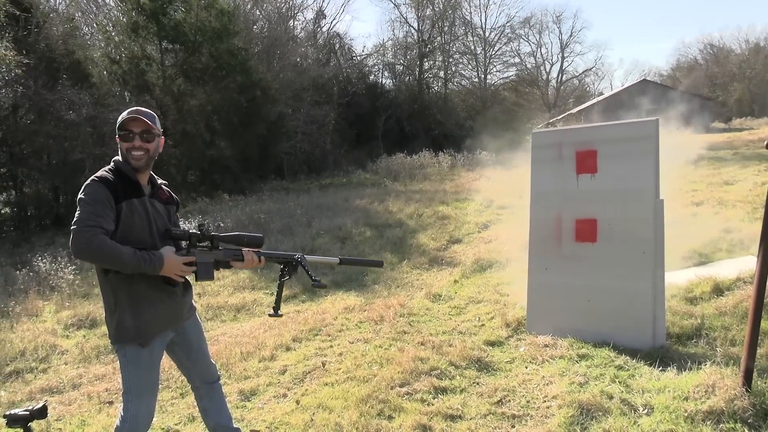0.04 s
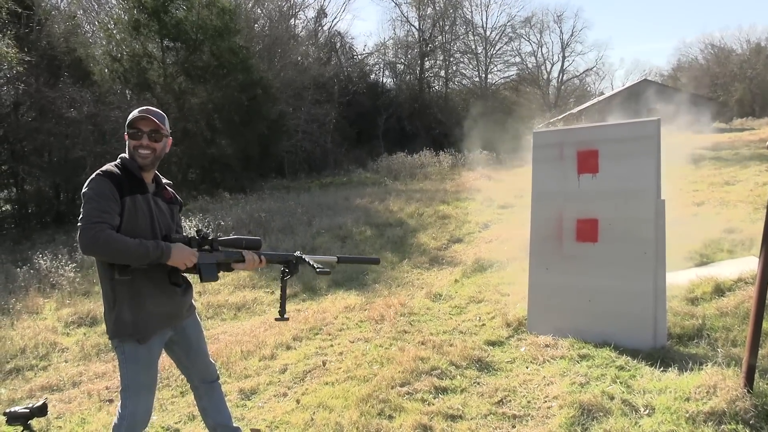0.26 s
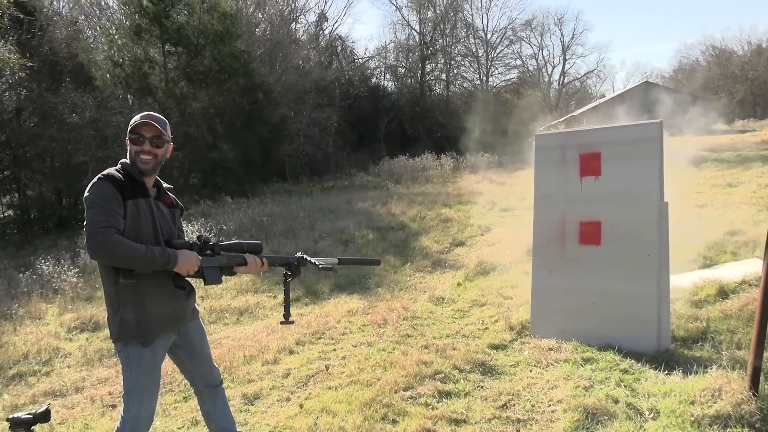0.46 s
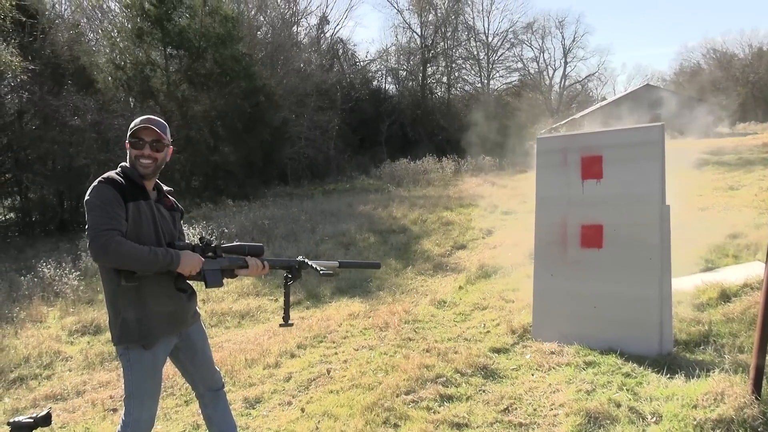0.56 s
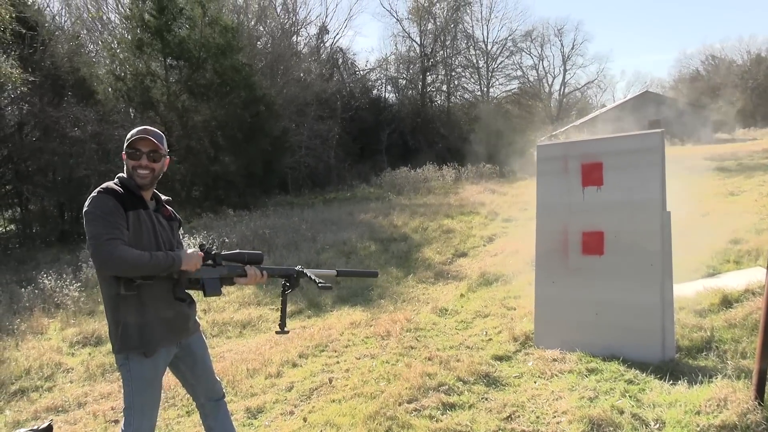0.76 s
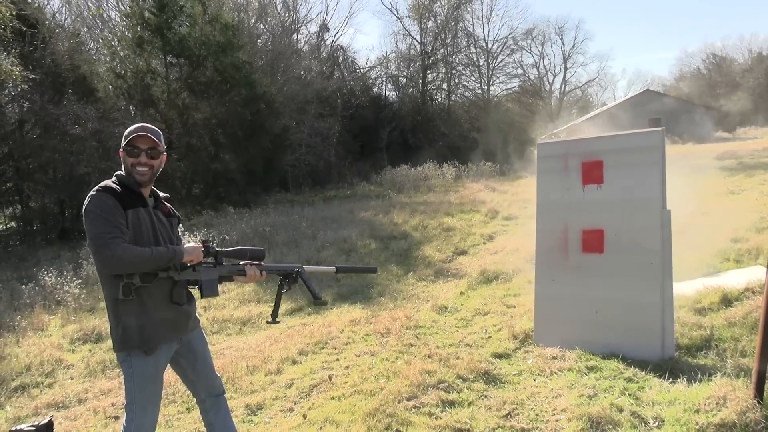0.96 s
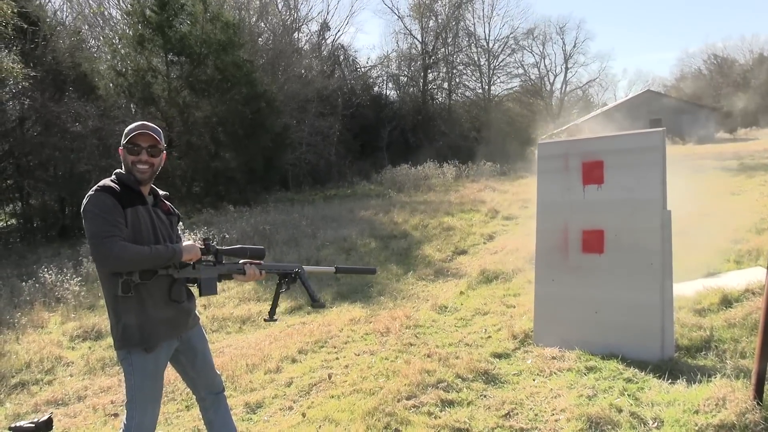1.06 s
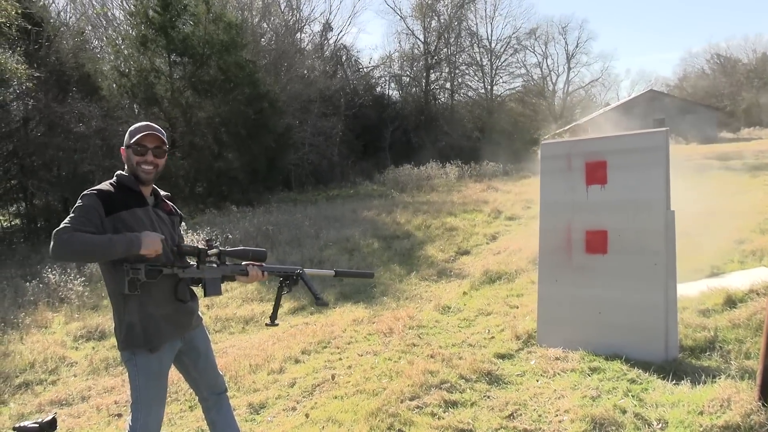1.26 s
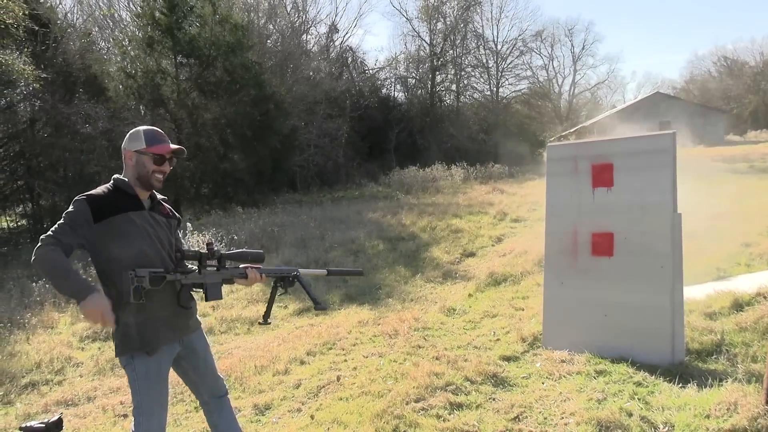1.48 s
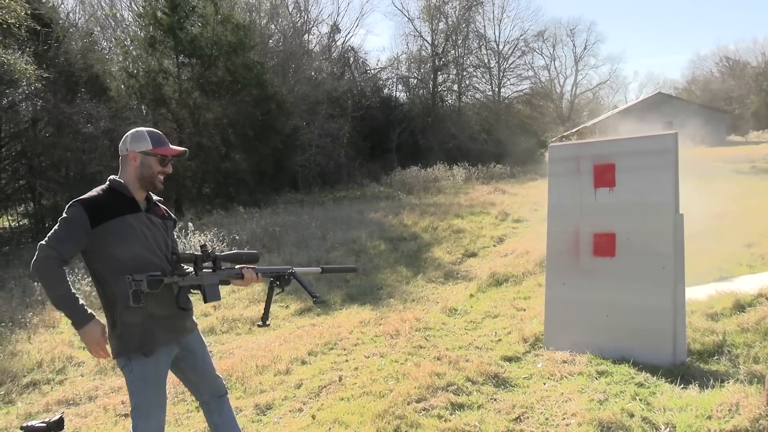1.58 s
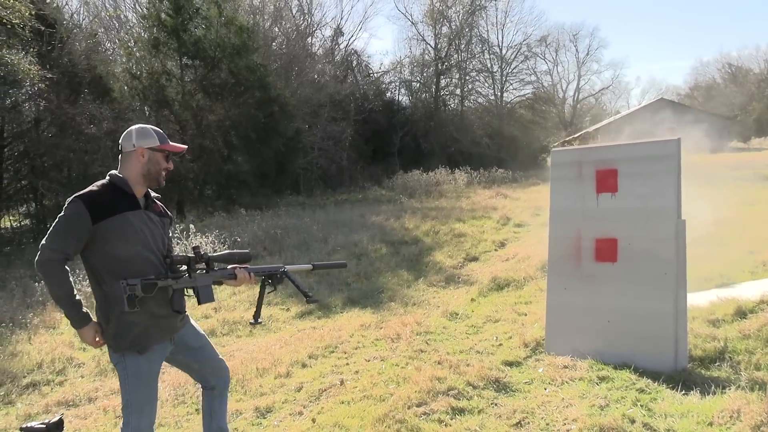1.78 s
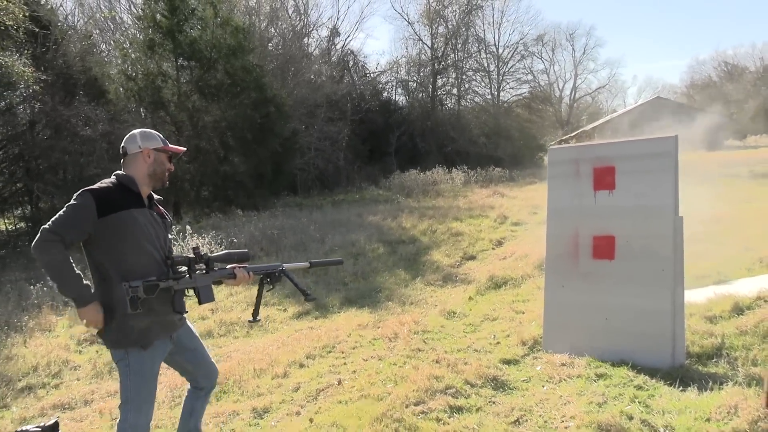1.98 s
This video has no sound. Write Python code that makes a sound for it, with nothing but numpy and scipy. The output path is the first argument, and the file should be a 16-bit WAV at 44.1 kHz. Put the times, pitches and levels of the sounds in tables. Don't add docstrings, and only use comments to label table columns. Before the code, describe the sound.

Rifle bolt lifted with a hard steel click, then clattering back to its stop, in wind

```python
import sys
import numpy as np
from scipy import signal
from scipy.fft import rfft, irfft
from scipy.io import wavfile
from scipy.ndimage import uniform_filter1d

SR = 44100
rng = np.random.default_rng(int(sys.argv[2]) if len(sys.argv) > 2 else 0)


def volts_from_db(level):
    exponent = np.asarray(level, float) / 20
    return 10 ** exponent


def output_pcm(signal):
    pcm = np.clip(np.atleast_2d(signal).T, -1, 1) * 32767
    wavfile.write(sys.argv[1], SR, np.round(pcm).astype(np.int16))


N = 89434


def evened(x):
    return x / np.sqrt(np.mean(x ** 2) + 1e-20)


def read(points, hz):
    f, value = np.transpose(points)
    return np.interp(np.log(hz + 1), np.log(f + 1), value)


def curve(points):
    s, db = np.transpose(points)
    return volts_from_db(np.interp(np.arange(N) / SR, s, db))


def add(mix, s, sound):
    part = mix[round(s * SR):][:len(sound)]
    part += sound[:len(part)]


def coloured(x, spectrum, extra_db=0):
    gain = volts_from_db(read(spectrum, np.fft.rfftfreq(len(x), 1 / SR)) + extra_db)
    return evened(irfft(rfft(x) * gain, len(x)))


def lumps(size, depth_db):
    smooth = uniform_filter1d(uniform_filter1d(rng.standard_normal(N), size), size)
    return volts_from_db(depth_db * evened(smooth))


def ring(modes, phases):
    swell_s = 0.00085
    t = np.arange(SR // 2) / SR
    tones = 0
    for (hz, db, t60), phase in zip(modes, phases):
        fade = volts_from_db(db - 60 * t / max(t60, .01))
        tones = tones + fade * np.sin(2 * np.pi * (hz * t + phase))
    return tones * np.clip(t / swell_s, 0, 1)


# (frequency [Hz], density [dB per Hz])
CONTACT_COLOUR = [(150, -52), (400, -28), (800, -13), (1420, -6), (2300, -0.5), (3600, -5.5), (7100, -10),
                  (15800, -24)]


def contacts(times, rows, modes, ring_db):
    rise_s, spot_width_oct, grit_db = .0006, 0.58, 2.5
    out = np.zeros(N)
    t = np.arange(4096) / SR
    octaves = np.log2((np.fft.rfftfreq(4096, 1 / SR) + 1) / 1000)
    for s, (db, octave, spot_db, length, t60) in zip(times, rows):
        bright_spot = spot_db * np.exp(-((octaves - octave) / spot_width_oct) ** 2)
        fade = volts_from_db(-60 * np.maximum(t - length, 0) / max(t60, .004))
        shape = np.clip(t / rise_s, 0, 1) * fade
        grit = np.repeat(np.minimum(rng.exponential(1, 256), 3), 16)
        rattle = coloured(rng.standard_normal(4096), CONTACT_COLOUR, bright_spot)
        rattle = rattle * evened(volts_from_db(grit_db * grit))
        add(out, s, volts_from_db(db - 13) * shape * rattle)
        add(out, s, volts_from_db(db + ring_db) * ring(modes, rng.random(len(modes))))
    return out


# (peak [dB], bright spot [octaves above 1 kHz], its strength [dB],
# rattle length [s], fade t60 [s])
LIFT_CONTACTS = [(-46, 2.3, 4.5, 0.004, .04), (-45, 2, 10.5, .006, 0.0512), (-42, 1.5, 3, 0.0069, .04),
                 (-6.5, 2.5, 8.5, 0.0046, 0.013), (-19, 3.2, 4, 0.0018, 0.06),
                 (0, 3.04, 5.5, 0.0024, 0.016), (-24.5, 3.7, -1, 0.0062, 0.018),
                 (-27.5, 1.3, 0, 0.0054, 0.068), (-39, 5, 0.5, 0.0014, 0.034), (-37, 2.2, 3.5, 0.0033, .05),
                 (-33, 1.5, 4, .004, .03)]
LIFT_TIMES = [.588, .659, .670, .8252, .8368, .8385, .851, .8755, .8805, .893, .8205]
# (frequency [Hz], level [dB], t60 [s])
CLOSED_MODES = [(1395, -14, 0.089), (1977, -4.5, 0.019), (3080, -18.5, 0.14), (3616, 5, 0.02),
                (4680, -11.5, 0.05), (4880, -18, 0.067), (6740, -17.5, 0.084), (7900, -13.5, 0.045),
                (8850, -12, 0.04)]


def bolt_lift():
    return contacts(LIFT_TIMES, LIFT_CONTACTS, CLOSED_MODES, ring_db=-20.5)


# (peak [dB], bright spot [octaves above 1 kHz], its strength [dB],
# rattle length [s], fade t60 [s])
DRAW_CONTACTS = [(-37.5, 0.57, 8.6, .004, 0.067), (-24.5, 4.6, 4, 0.0019, 0.026),
                 (-21.5, 0.77, 4.4, 0.0019, 0.025), (-25.5, 5.7, 5.3, 0.0029, .03),
                 (-34, 3.7, 4, 0.0011, 0.016), (-15.5, 2.9, 4, 0.0038, 0.024), (-22.5, 2, 7.5, .003, 0.12),
                 (-14, 2, 4, 0.0026, 0.027), (-12, 3.05, 12, 0.0014, 0.019),
                 (-1.5, 2.32, 25, 0.00092, 0.01), (-2, 3.59, 14.1, 0.0028, 0.021),
                 (5.5, 3, 5.3, 0.0004, 0.011), (-4.5, 1.45, 10, 0.0022, 0.028),
                 (-23.5, 4.2, 4.4, 0.0013, 0.094), (-52.5, 1.5, 2.2, 0.0088, 0.064)]
DRAW_TIMES = [1.0755, 1.1342, 1.1378, 1.1525, 1.157, 1.1658, 1.1805, 1.1852, 1.197, 1.2025, 1.2105, 1.2122,
              1.2165, 1.226, 1.802]
# (frequency [Hz], level [dB], t60 [s])
OPEN_MODES = [(1517, -9, 0.096), (2240, -7.5, 0.085), (2420, -7, 0.062), (2920, -7.5, .1), (3007, -7, .1),
              (3320, -28.5, 0.11), (3620, -7, 0.079), (4660, -34, .1), (4600, -31, 0.088),
              (6550, -2, 0.036), (7680, -18.5, 0.16)]


def bolt_draw():
    return contacts(DRAW_TIMES, DRAW_CONTACTS, OPEN_MODES, ring_db=-32)


# (time [s], frequency [Hz], level [dB], t60 [s])
RECEIVER_NOTES = [(.575, 3020, -55, .03), (.588, 3030, -55, .03), (.66, 3560, -49, 0.043),
                  (0.659, 2650, -51.5, 0.039), (0.672, 2480, -47, 0.022), (.674, 2000, -53, 0.044),
                  (0.8269, 1987, -21.5, 0.033), (.8256, 2917, -26, 0.024), (0.8263, 3847, -29.5, 0.023),
                  (0.825, 4510, -21, 0.036), (0.826, 7670, -24.5, .025), (.828, 1114, -31.5, 0.051),
                  (.8391, 1925, -26, .03), (.8405, 2830, -20, 0.038), (.839, 3625, -15, .035),
                  (.8381, 7150, -18, .025), (.8381, 8750, -23, .025), (.851, 8320, -36, 0.045),
                  (0.853, 2730, -41, 0.07), (0.877, 2030, -37, 0.038), (.876, 4750, -40.5, 0.079),
                  (.878, 5220, -44.5, 0.1), (.876, 3550, -41, 0.061), (1.076, 1424, -50, 0.072),
                  (1.135, 2222, -31, 0.034), (1.134, 4301, -35.5, 0.03), (1.146, 1455, -41.5, .12),
                  (1.1525, 3050, -42, .04), (1.1523, 3580, -41, 0.035), (1.165, 1582, -30, 0.084),
                  (1.168, 2275, -36.5, 0.044), (1.166, 3710, -29.5, 0.034), (1.166, 5190, -32.5, 0.051),
                  (1.1802, 2615, -26, 0.025), (1.187, 3052, -28.5, 0.037), (1.186, 3726, -28, .04),
                  (1.1855, 5020, -25.5, .04), (1.184, 9760, -33, .04), (1.196, 3210, -22.5, .025),
                  (1.197, 4660, -25.5, .02), (1.197, 8450, -25, 0.021), (1.2025, 5020, -18.5, .025),
                  (1.2112, 2259, -12, .03), (1.2113, 3505, -13.5, .028), (1.2119, 4310, -16, 0.025),
                  (1.2112, 6490, -16, .025), (1.2165, 2342, -18.5, .035), (1.227, 2340, -33.5, 0.08),
                  (1.225, 2740, -35.5, 0.11)]


def pings():
    out = np.zeros(N)
    for s, hz, db, t60 in RECEIVER_NOTES:
        add(out, s, ring([(hz, db, t60)], rng.random(1)))
    return out


# (time [s], level [dB])
SCRAPE_PRESSURE = [(1.07, -74.5), (1.09, -58), (1.13, -53.5), (1.14, -53), (1.165, -47), (1.177, -49),
                   (1.19, -36), (1.208, -33), (1.215, -74.5)]
# (frequency [Hz], width [Hz], level [dB])
SCRAPE_BANDS = [(1640, 250, 0.5), (2540, 1400, 3.5), (4850, 2000, -1), (8400, 610, -1.5),
                (12000, 3100, -12)]


def slide():
    grains = rng.standard_normal(N) * lumps(size=60, depth_db=5.5)
    hz = np.fft.rfftfreq(N, 1 / SR)
    bands = sum(volts_from_db(db) / (1 + (2 * (hz - f) / width) ** 2) for f, width, db in SCRAPE_BANDS)
    return curve(SCRAPE_PRESSURE) * evened(irfft(rfft(grains) * bands, N))


# (frequency [Hz], level [dB], t60 [s])
CASE_MODES = [(9790, -11, .22), (9852, 0, .15), (9868, -22, .36), (14850, -19, .09), (14925, -17, .12),
              (15519, -7, .13), (15628, -12, .155)]
# (time [s], level [dB])
CASE_KNOCKS = [
    (1.159, -51),
    (1.185, -39.5),
    (1.208, -28),
    (1.2164, -26),
    (1.2269, -28),
]


def brass():
    grip_s, grip_len_s, grip_db = 1.1655, .016, -33
    grip_hz, grip_up_hz = 10050, 250
    out = np.zeros(N)
    t = np.arange(0, 2 * grip_len_s, 1 / SR)
    pitch = grip_hz + grip_up_hz * np.sin(np.pi * t / grip_len_s * .8)
    turns = np.cumsum(pitch) / SR
    level = volts_from_db(grip_db - 16 * (t / grip_len_s) ** 2) * np.clip(t / 0.0012, 0, 1)
    add(out, grip_s, level * np.sin(2 * np.pi * turns))
    for s, db in CASE_KNOCKS:
        add(out, s, volts_from_db(db) * ring(CASE_MODES, rng.random(len(CASE_MODES))))
    return out


# (frequency [Hz], t60 [s])
STOCK_MODES = [(340, .16), (615, .05), (760, .06), (972, .09), (1045, .05), (535, .035)]
# (time [s], low, hollow, middle and bright note [dB])
KNOCKS = [
    (.839, -55.5, -20, -48.5, -33),
    (.876, -63, -36.5, -48, -36),
    (1.076, -73, -52.5, -42.5, -59.5),
    (1.136, -72, -36.5, -47, -38.5),
    (1.212, -39, -21, -40, -25),
    (1.2195, -62, -50, -55, -19.5),
]


def stock():
    out = np.zeros(N)
    for s, low, hollow, middle, bright in KNOCKS:
        dbs = low, hollow, middle, bright, bright, hollow - 9
        modes = [(hz, db, t60) for (hz, t60), db in zip(STOCK_MODES, dbs)]
        add(out, s, ring(modes, rng.random(len(modes))))
    return out


# (frequency [Hz], t60 [s])
YARD_FADE = [(400, 0.62), (1500, 0.51), (4000, 0.36), (9000, 0.28), (15000, 0.3)]


def yard(x):
    tail_db, ground_s, ground_db = -20, 0.0066, -31
    hz, t, z = signal.stft(rng.standard_normal(SR // 2), SR, nperseg=256)
    fade = volts_from_db(-60 * t / read(YARD_FADE, hz)[:, None])
    tail = signal.istft(z * fade, SR, nperseg=256)[1]
    tail = volts_from_db(tail_db) * tail / np.linalg.norm(tail)
    tail[round(ground_s * SR)] += volts_from_db(ground_db)
    return signal.fftconvolve(x, tail)[:N]


# (time [s], level [dB])
HEAVE_PRESSURE = [(0, -13), (.45, -19), (.65, -9.5), (.85, -14), (1.15, -18.5), (1.35, -16), (1.6, -20.5),
                  (2.03, -11.5)]
# (frequency [Hz], density [dB per Hz])
HEAVE_COLOUR = [(2, -22), (5, -6), (11, 0), (20, -8), (35, -22), (60, -48), (200, -110)]
# (time [s], level [dB])
GUSTS = [(0, -35.5), (.1, -35.5), (.22, -42), (.32, -31.5), (.45, -37.5), (.56, -29), (.72, -30.5),
         (1.0, -30.5), (1.09, -36), (1.28, -29), (1.45, -47), (1.52, -38.5), (1.6, -46.5), (1.71, -29),
         (1.8, -36.5), (1.87, -25.5), (2.03, -28.5)]
# (frequency [Hz], density [dB per Hz])
BUFFET_COLOUR = [(10, -64), (30, 2), (60, -2.5), (120, -16), (250, -30.5), (500, -42.5), (1200, -52.5),
                 (5000, -100)]


def wind():
    heave = curve(HEAVE_PRESSURE) * coloured(rng.standard_normal(N), HEAVE_COLOUR)
    turbulence = rng.standard_normal(N) * lumps(size=400, depth_db=1.5)
    return heave + volts_from_db(-0.32) * curve(GUSTS) * coloured(turbulence, BUFFET_COLOUR)


# (frequency [Hz], density [dB per Hz])
AIR_COLOUR = [(180, -33), (300, -4.5), (957, -7), (1270, -12), (1420, -11), (2190, -16.5), (3430, -19.5),
              (15800, -36)]
# (time [s], level [dB])
MOVEMENT = [(0, -80), (.2, -69), (.5, -106), (.8, -64), (.9, -58), (1.0, -66), (1.1, -76), (1.4, -74.5),
            (1.6, -77), (1.72, -59.5), (1.79, -60), (1.81, -53.5), (1.88, -59.5), (2.03, -58)]
# (frequency [Hz], density [dB per Hz])
RUSTLE_COLOUR = [(350, -42.5), (700, -0.5), (4790, -7), (7300, -8), (8400, -4.5), (10500, -16), (13000, -9),
                 (15800, -19)]


def field():
    air = rng.standard_normal(N) * lumps(size=900, depth_db=0.5)
    rustle = rng.standard_normal(N) * lumps(size=150, depth_db=1.5)
    return volts_from_db(-61) * coloured(air, AIR_COLOUR) + curve(MOVEMENT) * coloured(rustle, RUSTLE_COLOUR)


# (frequency [Hz], level [dB])
SIDE_TINT = [(20, 6.5), (60, 1), (250, 1.5), (600, 10), (2000, 7.3), (15000, 7.5)]


def scene():
    side_db, side_bolt_db = -42.5, -38
    steel = bolt_lift() + bolt_draw() + slide()
    notes = stock() + brass() + pings()
    bolt = steel + notes
    mid = bolt + yard(steel + volts_from_db(-9) * notes) + wind() + field()
    tint = volts_from_db(side_db + read(SIDE_TINT, np.fft.rfftfreq(N, 1 / SR)))
    side = irfft(rfft(wind() + field()) * tint, N)
    side = side + volts_from_db(side_bolt_db) * np.roll(bolt, 30)
    return np.array([mid + side, mid - side])


def top_cut(x):
    return signal.sosfilt(signal.butter(12, 15900, fs=SR, output="sos"), x)


def record(dry):
    limited = dry / (1 + (dry / .9) ** 6) ** (1 / 6)
    low_pass = signal.firwin(1023, 15900, window=("kaiser", 8), fs=SR)
    mix = signal.oaconvolve(limited, low_pass[None], "same")
    return top_cut(mix)


dry = scene()
out = record(dry)
output_pcm(out)
```